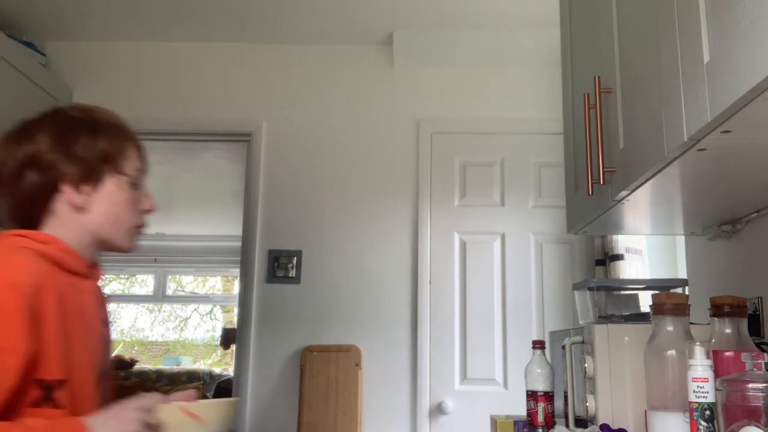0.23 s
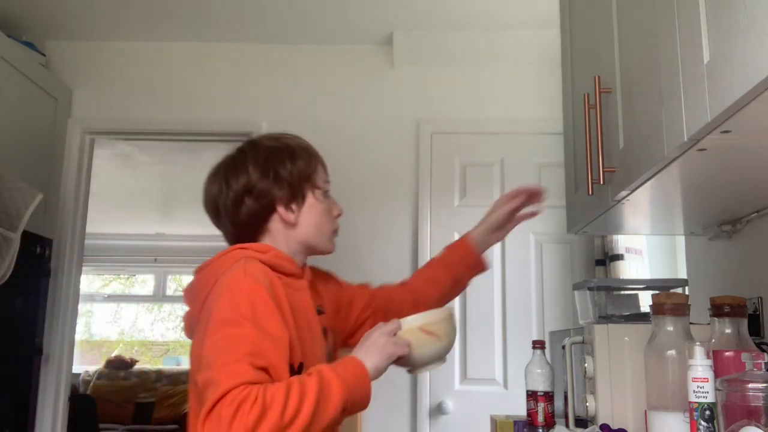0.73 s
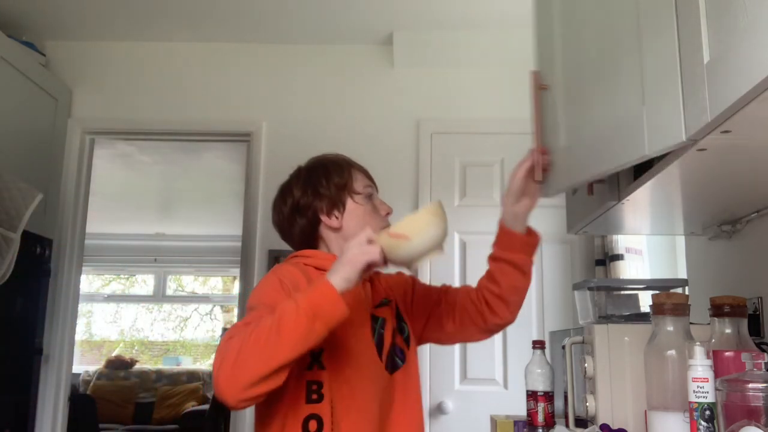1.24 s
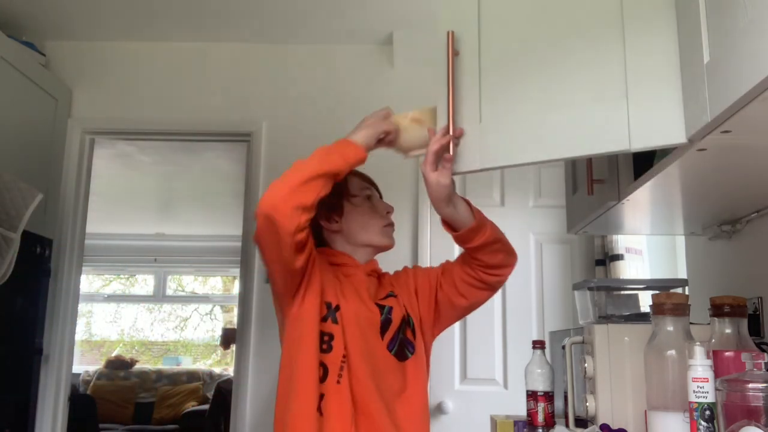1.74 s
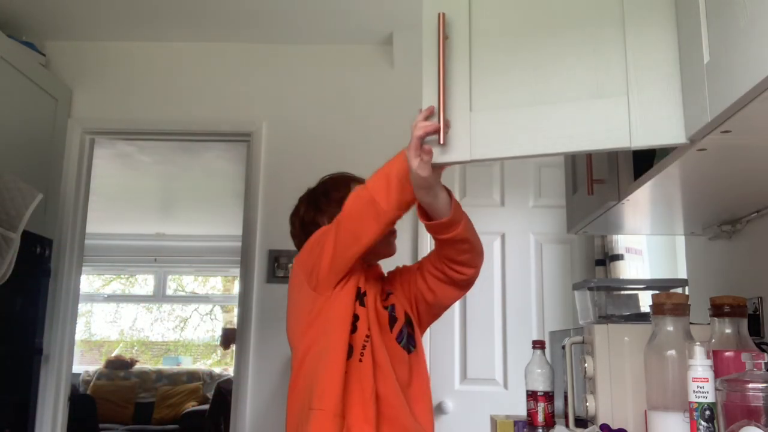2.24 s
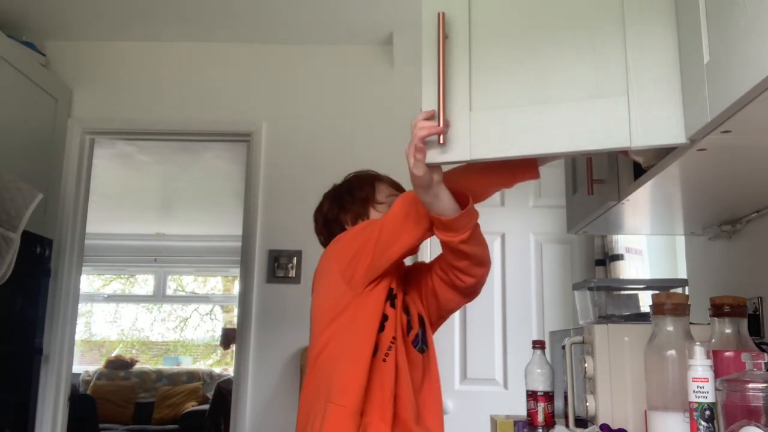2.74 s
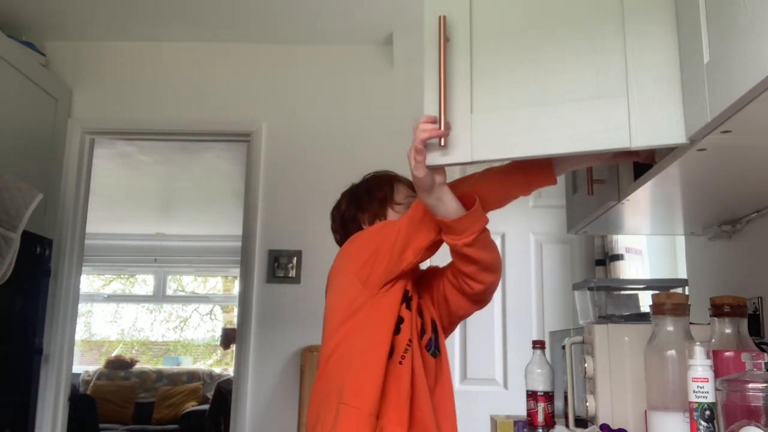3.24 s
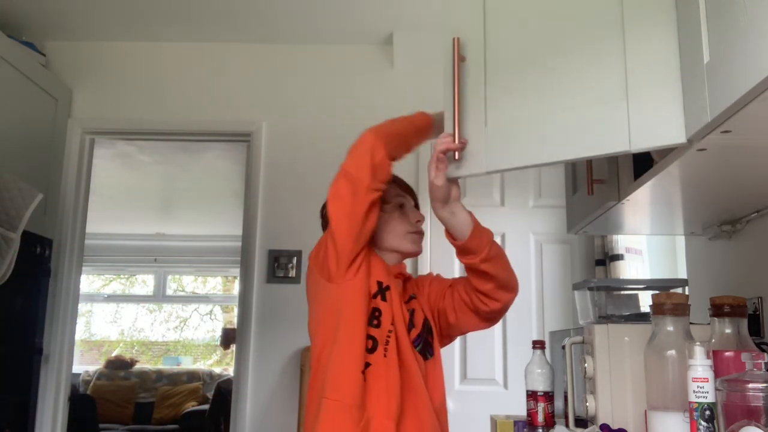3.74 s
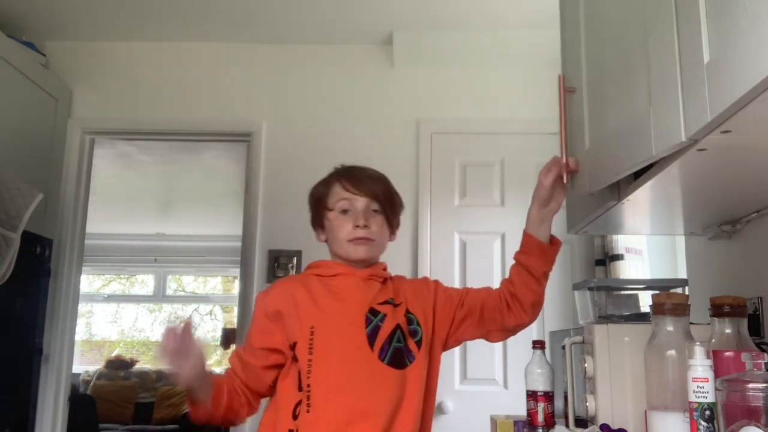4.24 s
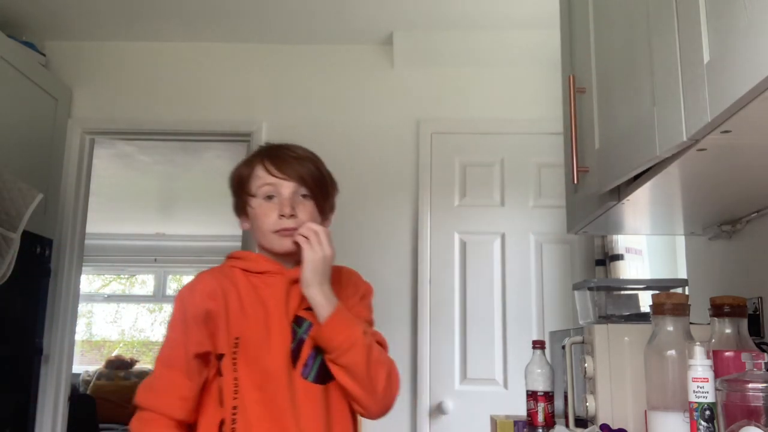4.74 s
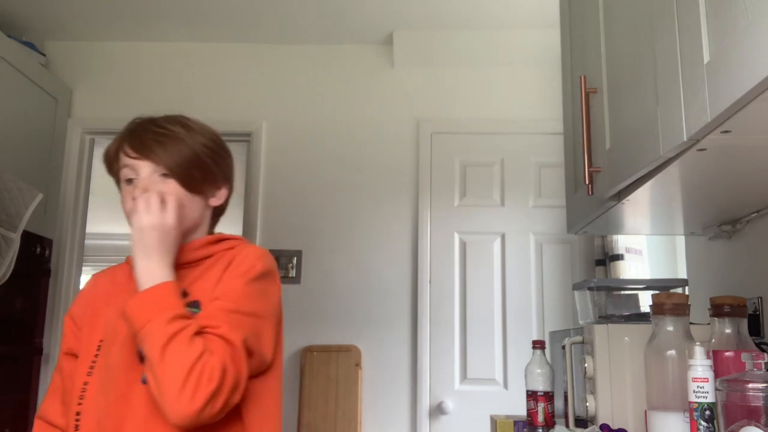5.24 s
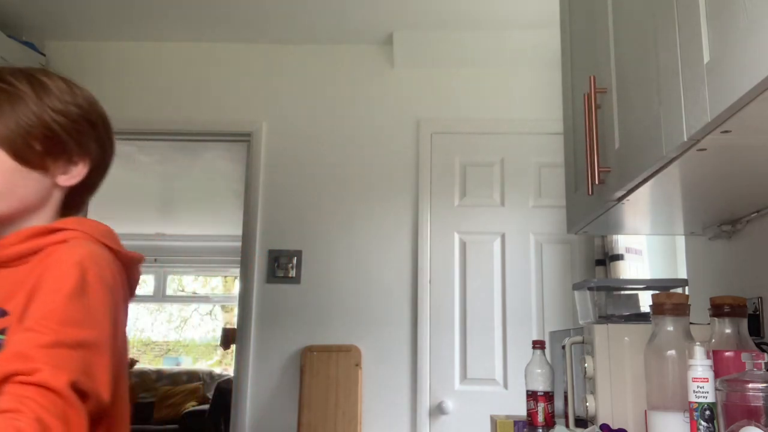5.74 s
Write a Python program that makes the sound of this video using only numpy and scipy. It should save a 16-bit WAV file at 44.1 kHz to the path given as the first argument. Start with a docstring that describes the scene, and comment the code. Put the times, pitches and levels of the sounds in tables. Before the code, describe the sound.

Throughout, two engines outdoors drone low, around 78 Hz sinking toward 50 Hz, pulsing several times a second as they beat; one passes early, the other lingers and weakens after 4.5 s. Soft rumble, a midrange whirr and faint hiss surround them. Barely audible rings and a scuff come before 0.5 s. At 0.93 s the cupboard handle ticks with low soft thumps, another at 1.07 s; a sharper hinge tick and scuff come at 1.4 s, and a tiny tick at 2.05 s. At 2.9 s a bowl hits the wooden shelf with a loud hollow knock, with lesser contacts until 3.16 s, then light scuffs. From 4.1 to 4.35 s there are gritty scuffs, a heavy soft thump and faint thin rings. Soft thumps follow at 5.16 and 5.55 s. At 5.85 s the door meets its frame in a firm, short woody knock. Dry small kitchen, uneven stereo from a small device.

```python
"""Two engines outdoors drone from the start, beating and sinking in pitch as they move away, over rumble,
whirr and hiss. A kitchen wall cupboard is opened with ticks and soft thumps; a bowl is set on its shelf;
scuffs, thumps and faint rings follow, and the door is swung shut. The drone is beating tones with noisy
overtones, knocks are decaying modes plus scattered noise, the rest shaped noise and single modes.
A small device with two uneven microphone ports picks it up."""
import sys
import numpy as np
from scipy import signal
from scipy.fft import rfft, irfft, next_fast_len
from scipy.io import wavfile

SR = 44100
rng = np.random.default_rng(int(sys.argv[2]) if len(sys.argv) > 2 else 0)


def attenuation_scalar(level_db):
    """Turn a level in dB into a linear amplitude multiplier (20 dB per decade)."""
    decades = np.asarray(level_db, float) / 20
    return 10 ** decades


def digitize_waveform(pressure):
    """Quantize a signal to 16-bit integers and store it at the path in sys.argv[1].

    Rows of a 2-D input are taken as channels; values are limited to [-1, 1].
    """
    field = np.atleast_2d(pressure).T
    bounded = np.clip(field, -1, 1)
    quanta = np.round(bounded * 32767).astype(np.int16)
    wavfile.write(sys.argv[1], SR, quanta)


N = 264631


def read(points, hz):
    """Columns of a table against log frequency."""
    f, *columns = np.transpose(points)
    return np.squeeze([np.interp(np.log(hz + 1), np.log(f + 1), c) for c in columns])


def lifted(peaks, hz):
    """dB gained at hz from a row of resonances."""
    return sum(up_db / (1 + (2 * (hz - mode_hz) / width_hz) ** 2) for mode_hz, width_hz, up_db in peaks)


def lowpass_db(corner_hz):
    """Spectrum of a slow waver: 6 dB down at the corner, then 12 dB per octave."""
    return lambda f: -20 * np.log10(1 + (f / corner_hz) ** 2)


def evened(x):
    """Scales to rms 1."""
    return x / np.sqrt(np.mean(x ** 2) + 1e-20)


def coloured(size, db_of):
    """Two unrelated noises whose spectrum in dB is db_of(Hz)."""
    hz = np.fft.rfftfreq(size, 1 / SR)
    spectrum = rfft(rng.standard_normal((2, size))) * attenuation_scalar(db_of(hz))
    return evened(irfft(spectrum, size))


def slow(top_hz):
    """Random waver of rms 1: sines up to top_hz, the slower the stronger."""
    t = np.arange(0, N, 64) / SR
    rates_hz = np.geomspace(.2, top_hz, num=24)
    wander = sum(np.sin(2 * np.pi * (f * t + rng.random())) / np.sqrt(f) for f in rates_hz)
    return np.interp(np.arange(N) / SR, t, evened(wander))


def dying(noise):
    """Each band of a noise dies at the speed of the room; a faint late part lingers from the next rooms."""
    # Each row: frequency in Hz, t60 in s.
    room = [(100, 0.4), (300, 0.2), (1000, 0.21), (3000, 0.22), (8000, 0.14)]
    hz, t, z = signal.stft(noise, SR, nperseg=512)
    fall_db = -60 * t / read(room, hz)[:, None]
    decay = attenuation_scalar(fall_db) + attenuation_scalar(-23.5 + 0.29 * fall_db)
    return signal.istft(z * decay, SR, nperseg=512)[1][:, :noise.shape[1]]


def add(mix, s, sound):
    """Lays a sound into the mix at time s."""
    part = mix[:, round(s * SR):][:, :sound.shape[-1]]
    part += sound[..., :part.shape[1]]


def wash():
    """Rumble that fades as the engines leave and sets the room's standing waves going; whirr; hiss."""
    # Outdoor noise through the walls. Each row: time in s, rumble in dB, whirr in dB (before the lifts below).
    wash_levels = [(0, -54, -68.5), (.9, -55.5, -70.5), (1.6, -58.5, -70.5), (4.3, -61, -71.5),
                   (4.8, -69, -75.5), (5.4, -67.5, -76.5), (6, -62, -74.5)]
    # Spectra of rumble, whirr and microphone hiss. Each row: frequency in Hz, level in dB.
    rumble_colour = [(18, -28), (30, -16.5), (72, -3.5), (108, -16), (160, -16.5), (286, -18.5),
                     (337, -26.5), (545, -27), (616, -35.5), (800, -31.5), (1040, -63), (1760, -120)]
    whirr_colour = [(400, -40.5), (680, -8), (780, -5), (860, -2.5), (985, 4), (1120, -8), (1250, -10.5),
                    (1700, -21), (2300, -26), (3200, -52), (5000, -76)]
    hiss_colour = [(880, -18.5), (1500, -15), (2230, -12), (2850, -12.5), (7100, -15), (7830, -21.5),
                   (8460, -29.5), (11900, -17), (13400, -17), (14400, -21.5), (15300, -36)]
    # Standing waves of the kitchen. Each row: frequency in Hz, width in Hz, lift in dB.
    standing = [(120, 9.9, 4.5), (196.3, 12, 5), (252, 8, 2.5), (275.6, 13, 9), (302.1, 4.8, 10),
                (359.7, 32, 6), (417.7, 8.4, 8.5), (531, 9.2, 6)]
    s, *columns = np.transpose(wash_levels)
    rumble_db, whirr_db = (np.interp(np.arange(N) / SR, s, c) for c in columns)
    swell_db = 1.2 * slow(8)
    rumble = coloured(N, lambda f: read(rumble_colour, f) + lifted(standing, f))
    rumble *= attenuation_scalar(rumble_db + 4.5 + swell_db)
    whirr = attenuation_scalar(whirr_db + 2.0 + swell_db) * coloured(N, lambda f: read(whirr_colour, f))
    hiss = attenuation_scalar(-86 + 0.27 * slow(44)) * coloured(N, lambda f: read(hiss_colour, f))
    return rumble + whirr + hiss


def drone():
    """Two near-pure firing tones beat; their overtones are smeared into narrow noise bands."""
    # Higher and lower engine; the lower passes first. Each row: time in s, level in dB.
    higher = [(0, -74.5), (.42, -47.5), (1.35, -48.5), (1.65, -41), (2.3, -45), (3.0, -40.5), (3.55, -45.5),
              (4.15, -42.5), (4.5, -49), (5.4, -52), (5.75, -61), (6, -53.5)]
    lower = [(0, -63), (.2, -49.5), (.8, -46.5), (1.15, -40.5), (1.35, -58), (2.0, -47), (2.45, -67),
             (4.15, -69), (6, -77.5)]
    # Each row: multiple of the firing tone, level in dB against it, half width in Hz.
    overtones = [(2, -16, 1.5), (3, -25, 2.7)]
    # The pitch sinks as the engines slow down and move away.
    start_hz, sinks_to_hz, sink_s = 77.7, 42.18, 4.35
    # The lower engine lags by the beat rate.
    beats_per_s, slowing_per_s2, least_beats_per_s, in_step_s = 6.43, 1.154, 4.0, 0.425
    t = np.arange(N) / SR
    hz = sinks_to_hz + (start_hz - sinks_to_hz) * np.exp(-t / sink_s)
    high_db = np.interp(t, *np.transpose(higher)) + 0.61 * slow(5.0)
    low_db = np.interp(t, *np.transpose(lower))
    beats = np.cumsum(np.maximum(beats_per_s - slowing_per_s2 * t, least_beats_per_s)) / SR
    ahead = 2 * np.pi * np.cumsum(hz) / SR
    behind = ahead - 2 * np.pi * (beats - np.interp(in_step_s, t, beats))
    engines = np.zeros((2, N))
    for phase, db in ((ahead, high_db), (behind, low_db)):
        engines += np.sqrt(2) * attenuation_scalar(db) * np.sin(phase + np.array([[0], [np.pi / 2]]))
        for k, under_db, half_width_hz in overtones:
            waver = coloured(N, lowpass_db(half_width_hz))
            # The reversed, swapped noise serves as the second quadrature.
            band = waver * np.cos(k * phase) + waver[::-1, ::-1] * np.sin(k * phase)
            engines += attenuation_scalar(db + under_db) * band
    return engines


def ring(db, hz, t60_s):
    """One thin mode, slightly rough."""
    t = np.arange(SR // 2) / SR
    rough = 1 + .6 * coloured(len(t), lowpass_db(50))
    rise = np.minimum(t / .006, 1)
    return attenuation_scalar(db - 60 * t / t60_s) * rise * rough * np.sin(2 * np.pi * hz * t)


def add_rings(mix):
    """Faint short rings of crockery and hinge, one decaying mode each."""
    # Each row: start in s, level in dB, pitch in Hz, t60 in s.
    rings = [(.125, -74, 2250, .25), (.13, -80, 3900, .2), (.12, -80, 5980, .2), (.929, -54, 930, .35),
             (.94, -72, 3750, .13), (1.416, -57, 790, .14), (4.228, -82, 3316, .9), (4.335, -82, 3316, .4),
             (4.34, -77, 1782, .8)]
    for s, *row in rings:
        add(mix, s, ring(*row))


def scuff(db, rise_s, hold_s, t60_s, centre_hz, fall_db):
    """A first crack, then gritty friction through the fittings that holds and dies."""
    # Handle and hinge resonances. Each row: frequency in Hz, width in Hz, lift in dB.
    fittings = [(738.3, 33, 24.5), (911, 192, 18), (2370, 130, 5), (2800, 40, -15.5), (3500, 740, -0.5),
                (3960, 240, 2.5), (4630, 53, 6), (5260, 50, -2), (5900, 67, 2.5)]

    def spectrum_db(f):
        bell_db = -fall_db * np.log2((f + 1) / centre_hz) ** 2
        treble_cut_db = np.minimum(12 * np.log10(1 + (f / 6700) ** 24), 24)
        return bell_db - treble_cut_db + lifted(fittings, f)

    t = np.arange(SR // 2) / SR
    after = np.maximum(t - rise_s, 0)
    friction = attenuation_scalar(-60 * np.maximum(after - hold_s, 0) / t60_s)
    crack = 0.46 * np.exp(-after / 0.0024)
    shape = np.minimum(t / rise_s, 1) * (friction + crack)
    grit = attenuation_scalar(2.5 * coloured(len(t), lowpass_db(200)))
    return attenuation_scalar(db) * shape * grit * coloured(len(t), spectrum_db)


def add_scuffs(mix):
    """Softer scuffs of hand, sleeve and door; rise and hold scale with the decay."""
    # Each row: start in s, level in dB, t60 in s, centre in Hz, fall in dB an octave off centre.
    scuffs = [(.42, -81, 0.22, 1800, 8), (1.45, -65, 0.2, 3500, 12), (3.19, -79, 0.17, 2800, 8),
              (3.27, -83.5, 0.26, 2300, 10), (3.38, -85, 0.29, 2300, 11), (4.11, -74.5, 0.28, 2700, 4.5),
              (4.135, -64, 0.43, 1584, 14.5), (4.305, -66, 0.22, 1280, 17), (4.72, -85.5, 0.69, 2200, 7.5),
              (5.32, -86, .15, 2290, 8), (5.47, -80, .3, 1700, 13), (5.505, -74.5, 0.27, 1850, 6)]
    for s, db, t60_s, *row in scuffs:
        add(mix, s, scuff(db, 0.05 * t60_s, 0.1 * t60_s, t60_s, *row))


def add_ticks(mix):
    """Sharp ticks of handle and hinge: friction with a fast fixed rise and short hold."""
    # Each row: start in s, level in dB, t60 in s, centre in Hz, fall in dB an octave off centre.
    ticks = [(.926, -57.5, .37, 1200, 2.5), (1.068, -71.5, .11, 4970, .5), (1.087, -71.5, .34, 2800, 8),
             (1.397, -67.5, .062, 3250, 41), (1.415, -48, 0.25, 2330, 3), (2.051, -75.5, 0.13, 2800, 23)]
    rise_s, hold_s = 0.0027, .009
    for s, db, *row in ticks:
        add(mix, s, scuff(db, rise_s, hold_s, *row))


def thump(db, hz, t60_s):
    """A soft push rings the floor or panel once; the room booms after it."""
    t = np.arange(SR // 2) / SR
    mode = attenuation_scalar(-60 * t / t60_s) * np.sin(2 * np.pi * hz * t + np.array([[0], [np.pi / 2]]))
    boom = dying(coloured(len(t), lambda f: -7.5 * np.log2((f + 1) / (0.87 * hz)) ** 2))
    boom *= 1 - np.exp(-(t / 0.02) ** 2)
    return attenuation_scalar(db) * (mode + 0.29 * boom) * (1 - np.exp(-t / .005))


def add_thumps(mix):
    """Soft low thumps of feet and door, one mode with boom each."""
    # Each row: start in s, level in dB, pitch in Hz, t60 in s.
    thumps = [(0.932, -34, 260, 0.12), (0.934, -29.5, 158.6, 0.1), (0.956, -26.5, 131.8, 0.22),
              (1.069, -27, 86.7, 0.11), (1.355, -36, 126.9, 0.3), (1.427, -33, 86.6, 0.17),
              (3.221, -33, 90, 0.1), (4.087, -39.5, 104, 0.27), (4.188, -27.5, 91, 0.081),
              (4.339, -21, 105, 0.1), (5.162, -33, 88.6, 0.18), (5.549, -42, 85, 0.13)]
    for s, *row in thumps:
        add(mix, s, thump(*row))


def head_rms(x):
    """Rms of the first 30 ms."""
    return np.sqrt(np.mean(x[:, :1323] ** 2))


def blow(db, bright_db, low_hz, ringing_share, modes, colour):
    """A wooden body rings in its modes; a crack and the scattered sound of the room go with it."""
    def contact_db(f):
        tilt_db = bright_db * np.log2(np.clip(f, 60, 2600) / 500)
        return tilt_db - 10 * np.log10(1 + (low_hz / (f + 1)) ** 4)

    t = np.arange(SR * 7 // 10) / SR
    hz, mode_db, t60_s = np.transpose(modes)[:, :, None]
    # The shared field starts from rest, the left port's own one at random phases.
    phase = 2 * np.pi * rng.random((2, len(modes), 1)) * np.array([0, 1])[:, None, None]
    partials = attenuation_scalar(mode_db + contact_db(hz) - 60 * t / t60_s) * np.sin(2 * np.pi * hz * t + phase)
    ringing = partials.sum(1)
    noise = coloured(len(t), lambda f: read(colour, f) + contact_db(f))
    rattle = attenuation_scalar(1.5 * coloured(len(t), lowpass_db(60)))
    crack = 0.82 * noise * np.exp(-t / 0.005)
    scatter = rattle * dying(noise) * (1 - np.exp(-t / 0.011)) + crack
    sound = ringing_share * ringing / head_rms(ringing) + (1 - ringing_share) * scatter / head_rms(scatter)
    return attenuation_scalar(db - 4.5) * sound * (1 - np.exp(-t / 0.0032))


def add_door_shut(mix):
    """The door meets the frame: blows on the door's modes."""
    # Each row: start in s, level in dB (before blow's 4.5 dB cut), brightness in dB per octave, low cut in Hz.
    contacts = [(5.834, -45.5, -2, 450), (5.849, -19.5, -0.7, 120), (5.897, -37, -5, 120)]
    # Each row: frequency in Hz, level in dB, t60 in s.
    door_modes = [(138, -13.5, 0.14), (250, -47, 0.057), (395, -9.5, 0.096), (515, -5.5, 0.079),
                  (590, -1.5, 0.056), (612, -13.5, 0.13), (642.2, 2.5, 0.16), (696.6, -10, 0.25),
                  (879, -18, 0.18), (945, -14, 0.23), (996, -6.5, 0.085), (1082, -4, 0.09),
                  (1260, -37, 0.13), (1480, -27.5, .12), (1780, -29.5, 0.11)]
    # Scattered sound. Each row: frequency in Hz, level in dB.
    door_colour = [(59, -41), (100, -20), (182, -24.5), (391, -13.5), (523, -14.5), (556, 2), (643, -10),
                   (824, -11), (1470, -21.5), (2090, -38.5), (6000, -38.5), (9450, -63.5), (14000, -64)]
    for s, *row in contacts:
        add(mix, s, blow(*row, 0.71, door_modes, door_colour))


def add_bowl_knocks(mix):
    """The bowl meets the shelf: blows on the shelf's modes."""
    # Each row: start in s, level in dB (before blow's 4.5 dB cut), brightness in dB per octave, low cut in Hz.
    contacts = [(2.901, -14, -0.2, 120), (2.962, -23, -2.5, 120), (3.038, -23.5, 2.5, 323),
                (3.162, -42, 0, 250)]
    # Each row: frequency in Hz, level in dB, t60 in s.
    shelf_modes = [(120, -1.5, 0.19), (171.8, -12, 0.53), (209, -8.5, .12), (240.4, 7.5, 0.082),
                   (266.7, -7.5, 0.25), (300.4, -9, 0.27), (360.4, -15.5, 0.13), (463, -4, 0.14),
                   (660, -36.5, 0.065), (732, -12, 0.17), (797, -10, 0.13), (873.3, -6, 0.095),
                   (952, -18.5, 0.2), (1039, -15.5, 0.36), (1272, -18.5, 0.2), (1400, -28.5, 0.5),
                   (1330, -37, 0.49), (1850, -25.5, 0.21), (1847, -34.5, 0.16), (2020, -20.5, 0.17),
                   (2445, -26, 0.13), (2700, -40.5, 0.14)]
    # Scattered sound. Each row: frequency in Hz, level in dB.
    shelf_colour = [(60, -27), (120, -3), (170, -10.5), (250, 0), (400, -13), (700, -18.5), (1000, -14.5),
                    (1500, -24.5), (2650, -35.5), (3100, -42), (6250, -57), (8700, -82), (11000, -72.5),
                    (14000, -76)]
    for s, *row in contacts:
        add(mix, s, blow(*row, 0.59, shelf_modes, shelf_colour))


def scene():
    """Two sound fields of the same kitchen: what both ports share, and what only the left one gets."""
    mix = wash() + drone()
    add_rings(mix)
    add_scuffs(mix)
    add_ticks(mix)
    add_thumps(mix)
    add_door_shut(mix)
    add_bowl_knocks(mix)
    return mix


def roll_off(x):
    """The treble ends steeply here."""
    return signal.sosfilt(signal.butter(12, 15450, fs=SR, output="sos"), x)


def record(dry):
    """The left port hears a turned, rebalanced and partly unrelated copy; the sum of the ports stays flat."""
    # Left port against right. Each row: frequency in Hz, left-right in dB, left's lead in rad, likeness 0-1.
    ports = [(50.5, -16.5, 4.5, 1), (115, -9.5, -0.7, 1), (168, -17, -0.9, 0.8), (235, -11, -4.5, 0.3),
             (342, -7, -2.5, .75), (593, -3, -3.5, 0.85), (950, 6, -4, 0.77), (1200, 4.5, -4.5, 0.3),
             (1390, 3, -6.5, 0.02), (2200, 0.2, -5.5, 0.3), (2920, -0.5, -8, 0), (6260, 1.9, -8, 1),
             (7200, 1.5, -8, 1), (9800, -3, -9.5, 0.92), (11100, 0.5, -11.5, 0.9), (13100, -0.5, -11.5, 1)]
    size = next_fast_len(N + SR)
    hz = np.fft.rfftfreq(size, 1 / SR)
    # The microphone drops the deepest bass and the top.
    passed = 1 / (1 + (42 / (hz + 1)) ** 6) / (1 + (hz / 14900) ** 60)
    shared, own = rfft(dry, size) * passed
    left_db, lead_rad, like = read(ports, hz)
    gain = attenuation_scalar(left_db)
    left = gain * np.exp(1j * lead_rad) * (like * shared + np.sqrt(1 - like ** 2) * own)
    flat = 2 / np.sqrt(1 + gain ** 2 + 2 * gain * like * np.cos(lead_rad))
    stereo = irfft(np.array([left, shared]) * flat, size)[:, :N]
    return roll_off(stereo)


dry = scene()
out = record(dry)
digitize_waveform(out)
```